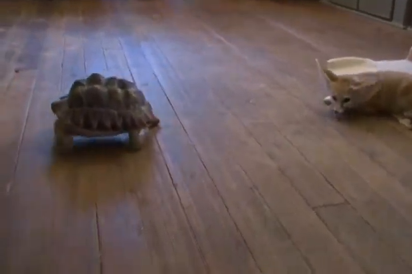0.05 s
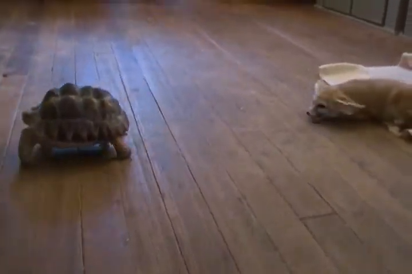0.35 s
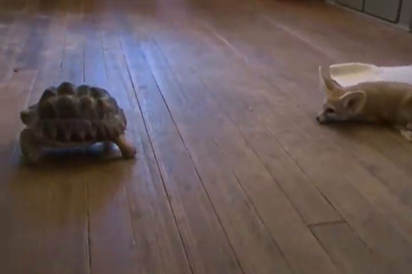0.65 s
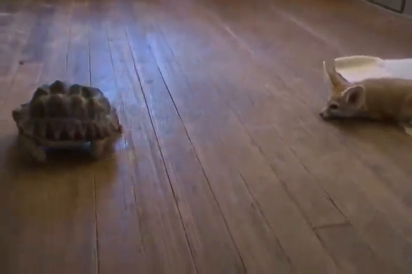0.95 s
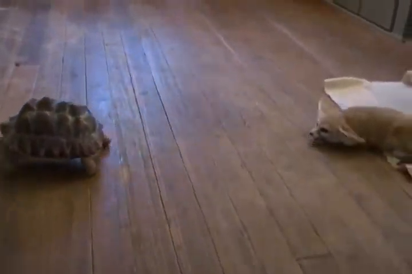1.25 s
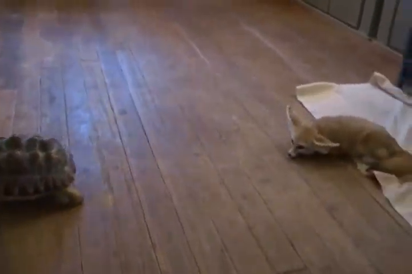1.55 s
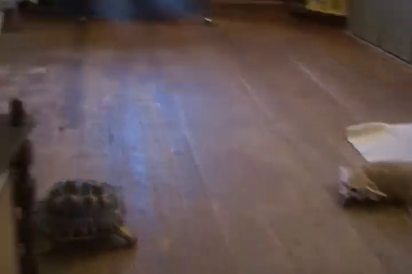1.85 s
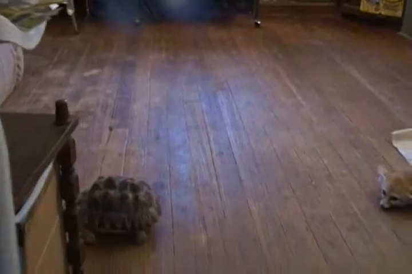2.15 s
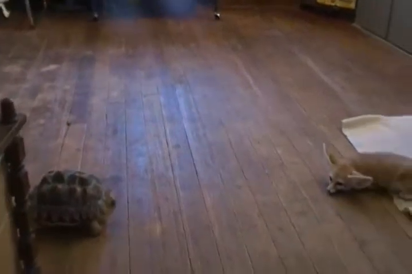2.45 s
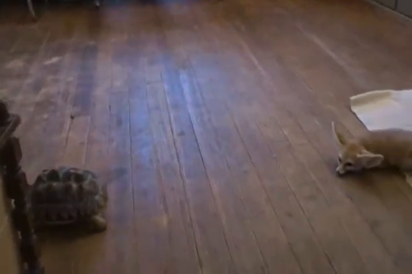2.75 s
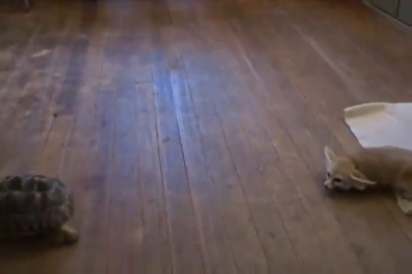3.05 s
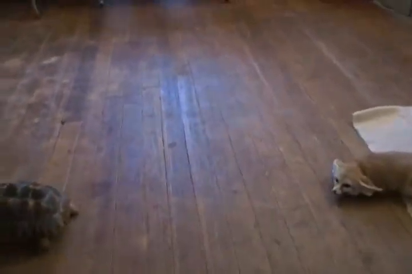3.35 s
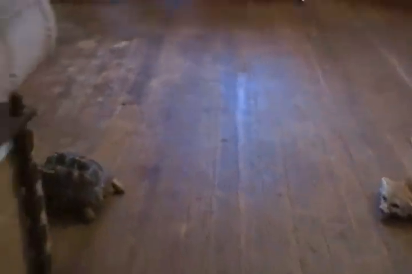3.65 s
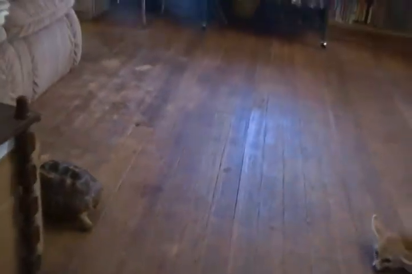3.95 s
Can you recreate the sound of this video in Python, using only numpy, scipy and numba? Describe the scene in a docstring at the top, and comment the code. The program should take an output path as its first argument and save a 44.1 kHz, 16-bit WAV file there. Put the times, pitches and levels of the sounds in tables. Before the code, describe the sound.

A small fox squeals four times, loud and harsh, in a quiet room.

```python
"""A quiet room with a wooden floor. Just right of the microphone a small fox squeals four times, while
a tortoise plods about with soft bumps, knocks and claw scratches. Each cry starts as a clean whine,
then breaks into a harsh scream: two vocal folds swing at different pitches and their sum tones ring
in the throat. The recorder's gain control ducks the room's hum under every cry."""
import sys
import numpy as np
from scipy import signal
from scipy.fft import rfft, irfft
from scipy.io import wavfile
from scipy.ndimage import uniform_filter1d, minimum_filter1d, map_coordinates
from numba import njit

SR = 44100
rng = np.random.default_rng(int(sys.argv[2]) if len(sys.argv) > 2 else 0)


def dump(signal):
    """Clip the signal to [-1, 1] and save it as 16-bit WAV at the path in sys.argv[1]."""
    limited = np.clip(np.atleast_2d(signal).T, -1, 1)
    pcm = np.round(limited * 32767).astype(np.int16)
    wavfile.write(sys.argv[1], SR, pcm)


N = 176400

# three short screams, then a long one: time_s, lower_fold_hz, upper_fold_hz, level_db, mouth, roughness
SCREAMS = [
    [(.188, 1302, 1667, -12, 0.94, 1.1), (.24, 1278, 1677, -9, 0.96, 0.8),
     (.31, 1259, 1651, -7.5, 1, 0.744), (.355, 1290, 1670, -4.5, 1, 0.885),
     (.40, 1213, 1622, -12.5, 0.55, 0.92), (.445, 1063, 1473, -23.5, 0.05, 0.77),
     (.475, 1033, 1423, -32.5, 0, 0.22)],
    [(1.349, 1329, 1631, -8, 0.85, 1.26), (1.365, 1262, 1602, -11, 0.9, 0.92),
     (1.395, 1231, 1560, -8.5, 0.88, 0.45), (1.445, 1183, 1519, -5.5, 0.87, 0.53),
     (1.472, 1153, 1496, -15.5, 0.62, 0.55), (1.50, 1009, 1397, -20.5, .1, 0.77),
     (1.53, 965, 1345, -27, 0, 0.516)],
    [(1.828, 1245, 1603, -11, 0.89, 0.97), (1.87, 1235, 1632, -12, 0.86, 0.62),
     (1.945, 1318, 1727, -4.5, 0.97, 0.93), (1.99, 1250, 1631, -5, 0.95, 1.25),
     (2.06, 1128, 1539, -16.5, 0.43, 0.6), (2.13, 1095, 1566, -17.5, 0.24, 0.63),
     (2.205, 1061, 1598, -16.5, 0.02, 1.1), (2.26, 994, 1333, -22.5, 0.24, 1.3)],
    [(3.05, 1094, 1336, -26, 0, 1), (3.115, 1156, 1426, -13, 0.38, 0.876),
     (3.2, 1182, 1470, -10, 0.64, 1.06), (3.28, 1169, 1484, -10.5, 0.68, 0.98),
     (3.335, 1158, 1459, -7.5, 0.69, 0.65), (3.41, 1197, 1535, -7.5, 0.78, 0.86),
     (3.52, 1161, 1546, -9, 0.83, 0.84), (3.62, 1181, 1560, -7.5, 0.83, 0.743),
     (3.72, 1163, 1517, -9.5, 0.85, 0.77), (3.81, 1026, 1348, -18.5, 0.1, 0.64),
     (3.87, 1000, 1286, -34, 0, 0.93)],
]  # mouth runs from 0 (shut) to 1 (open)
# tones the two folds make together: lower_multiple, upper_multiple
FOLD_TONES = [(1, 0), (0, 1), (-1, 2), (2, 0), (1, 1), (0, 2), (3, 0), (2, 1), (1, 2), (3, 1), (2, 2),
              (1, 3), (4, 1), (3, 2), (4, 2), (3, 3)]
# balance of those tones, in the same order: level_db
SHORT_TONE_DB = [4, 2, -3, -.5, 3, -4, 1.5, 3, 4, -2, -4.5, -10.5, -9, -10.5, -8.5, -17]
LONG_TONE_DB = [2.5, -4, -6.5, 3, 4.5, 0, 2, 2, -2.5, -0.5, -7, -4, -4.5, -32, -17, -20]
# throat resonances: shut_hz, open_hz, base_width_hz, shut_db, open_db
SHORT_THROAT = [(1480, 1230, 650, 0.5, -15), (2080, 2700, 1330, -11, -10.5), (3170, 4360, 1130, -17, -1),
                (4670, 6500, 1230, -14.5, -11), (8600, 7970, 1230, -28, -18.5)]
LONG_THROAT = [(1536, 1530, 580, 4, -11.5), (2460, 3023, 1060, -13, -1), (3570, 3580, 1406, -4.5, -2),
               (4220, 4700, 1204, -20, 3.5), (8300, 9800, 2400, -33, -25)]
# dips between the resonances: centre_hz, width_hz, depth_share
SHORT_DIPS = [(2160, 360, 0.11), (3560, 280, 0)]
LONG_DIPS = [(2076, 450, 0.47), (3000, 180, 0.61)]
# paths of the clean voice: time_s, pitch_hz, level_db
WHINES = [
    [(.119, 1460, -26.5), (.131, 1265, -18.5), (.142, 1452, -23.5), (.158, 1391, -31), (.1595, 1452, -10.5),
     (.175, 1647, -9), (.191, 1682, -9), (.203, 1620, -28)],
    [(1.241, 1140, -22), (1.271, 1352, -18), (1.279, 1280, -17.5), (1.305, 1470, -16.5), (1.322, 1452, -27),
     (1.3245, 1610, -2.5), (1.346, 1649, -2), (1.356, 1730, -19)],
    [(1.791, 1281, -21.5), (1.818, 1440, -22.5), (1.822, 1518, -6), (1.832, 1540, -13.5),
     (1.845, 1450, -26)],
]  # one opens each short cry
SQUEAK = [(2.16, 1551, -28.5), (2.21, 1680, -15), (2.236, 1770, -15), (2.255, 1883, -14.5),
          (2.276, 1990, -17), (2.294, 1786, -18.5)]  # the upper fold alone as the third cry ends
YELP = [(3.026, 904, -32), (3.043, 990, -18.5), (3.066, 1074, -27)]  # low, opens the long cry
# harmonics of the clean voice, from the first up: level_db
SOFT_WHINE_DB = [-1.5, -12, -18, -24.5, -30, -58]
LOUD_WHINE_DB = [-12, -4.5, -4.5, -19.5, -32, -37.5]
SQUEAK_DB = [-5.5, -3.5, -12, -26, -25.5, -35]
YELP_DB = [-6.5, -4, -12.5, -18, -23.5, -29]
# soft bumps on the floor: start_s, base_level_db, decay_s, pitch_hz
BUMPS = [(0.035, -25.5, 0.035, 39), (0.111, -36.5, 0.056, 49), (0.904, -38.5, 0.0086, 264),
         (2.659, -32, 0.018, 223), (2.669, -31.5, 0.043, 44), (2.818, -22.5, 0.054, 37),
         (2.889, -22, 0.038, 34.4), (3.476, -35, .025, 207)]
# knocks and claw scratches on the boards: start_s, level_db, decay_s
KNOCKS = [(.036, -28, 0.0064), (.9, -48, 0.014), (2.645, -40, 0.021), (2.955, -37.5, 0.15),
          (3.313, -27.5, 0.017)]
SCRATCHES = [(.836, -34, 0.018), (.862, -45, 0.014), (.954, -35, 0.0025), (1.203, -38.5, 0.0039),
             (2.655, -46.5, 0.044)]
# spectra of the boards, the claws and the room tone: frequency_hz, relative_db
BOARD_COLOUR = [(100, -8.5), (320, 1), (700, -3), (1400, -6.5), (3500, -21.5), (7000, -55), (12000, -58.5)]
CLAW_COLOUR = [(800, -21.5), (2500, -3.5), (4700, 1), (7000, -11.5), (11000, -12.5)]
ROOM_COLOUR = [(15, -35.5), (25, 0), (70, -10), (115, -16), (249, -19.5), (418, -21.5), (682, -25.5),
               (776, -24), (861, -28.5), (1440, -33.5), (1600, -32.5), (1920, -33.5), (9760, -44.5),
               (12000, -53), (15600, -64), (22000, -120)]
# stereo width of diffuse sound at the microphone: frequency_hz, side_over_mid_db
SPREAD = [(60, -10.5), (500, -14.5), (1300, -7.5), (4000, -2.5), (8000, 3)]
# time the room takes to fall 60 dB: frequency_hz, decay_s
ROOM_T60 = [(200, 0.11), (1200, 0.47), (2500, 0.37), (4500, 0.31), (10000, 0.31)]

# jitter and waver are shares of the pitch; rates are changes per second
LOW_JITTER, HIGH_JITTER, JITTER_RATE = 0.0224, 0.065, 420  # screaming folds at roughness 1
WHINE_JITTER, SQUEAK_JITTER, YELP_JITTER = 0.01466, 0.027, 0.033
WAVER, WAVER_RATE = 0.003997, 45.8
DRIFT_RAD, DRIFT_RATE = 1.36, 12.3  # each tone wanders out of step with the others
FLUTTER, FLUTTER_RATE = 1.5, 800  # fast flicker in the strength of the tones
SCREAM_SHUDDER_DB, WHINE_SHUDDER_DB, SHUDDER_RATE = 0.5, 0.8, 270
FOLD_DRIVE, SCREAM_AIR_DB, WHINE_AIR_DB = 1.27, 1, -16.5  # air at roughness 1 and at full press
VOICE_LOW_HZ, PIERCE_WIDTH_HZ = 990, 330.0
TREBLE_CUT_HZ = 9720  # a steep cut of the top treble during the screams
SOFT_AT_DB, LOUD_AT_DB, EDGE_S = -20, -12, 0.0009
REVERB_DB, REVERB_ONSET_S, LEFT_LAG_S = -5, 0.0041, 0.000019
ROOM_TONE_DB, HUM_DB, HUM_HZ = -37, -45.5, 120
THRESHOLD, RATIO, ATTACK_S, RELEASE_S = 0.5024, 17, 0.0017, 0.13
CEILING, LOOK_AHEAD_S, TOP_HZ = 0.71, 0.00028, 12000


def screams(tables, tone_db, throat, dips, pierce=0):
    """The fox's harsh voice: two clashing folds and rushing air sound through the throat."""
    gate = sum(controls(rows)[0] for rows in tables)
    _, low_hz, high_hz, db, mouth, rough = controls([row for rows in tables for row in rows])
    voice = throat_ring(vocal_folds(low_hz, high_hz, rough, tone_db), mouth, throat)
    # with the mouth open, one sum tone can ring piercingly
    voice += pierce * mouth ** 2 * bandpass(voice, 2 * low_hz + high_hz, PIERCE_WIDTH_HZ)
    for hz, width, depth in dips:
        voice -= depth * bandpass(voice, np.full(N, float(hz)), float(width))
    band = signal.butter(8, [VOICE_LOW_HZ, TREBLE_CUT_HZ], "band", fs=SR, output="sos")
    voice = signal.sosfilt(band, voice)
    voice /= np.sqrt(uniform_filter1d(voice ** 2, size=2048) + 1e-12)  # even out the level
    return voice * gate * undb(db + SCREAM_SHUDDER_DB * wander(SHUDDER_RATE))


def vocal_folds(low_hz, high_hz, rough, tone_db):
    """Two folds beat roughly against each other, while air puffs through in time with the lower."""
    waver = 1 + WAVER * wander(WAVER_RATE)
    low = fold_phase(low_hz * waver, LOW_JITTER * rough)
    high = fold_phase(high_hz * waver, HIGH_JITTER * rough)
    low_size = np.sqrt(undb(FLUTTER * rough * wander(FLUTTER_RATE)))
    high_size = undb(FLUTTER * rough * wander(FLUTTER_RATE))
    tones = np.zeros(N)
    for (m, n), db in zip(FOLD_TONES, tone_db):
        phase = m * low + n * high + DRIFT_RAD * wander(DRIFT_RATE)
        tones += undb(db) * (high_size if n else low_size) * np.sin(phase)
    colliding = unit(np.tanh(FOLD_DRIVE * unit(tones)))  # collisions flatten the largest swings
    air = unit(rng.standard_normal(N) * (1 + np.sin(low)))
    return colliding + undb(SCREAM_AIR_DB) * rough * air


def throat_ring(source, mouth, throat):
    """The throat's resonances shift and brighten as the mouth opens."""
    voice = np.zeros(N)
    for k, (shut_hz, open_hz, width, shut_db, open_db) in enumerate(throat):
        hz = shut_hz + (open_hz - shut_hz) * mouth
        db = shut_db + (open_db - shut_db) * mouth
        voice += (-1) ** k * undb(db) * resonance(source, hz, 1.817 * width)
    return voice


def clean_voice(rows, soft_db, loud_db, jitter):
    """One fold swings alone; pressed harder, it gains air and moves from soft to loud harmonics."""
    gate, hz, db = controls(rows)
    phase = fold_phase(hz, jitter)
    press = np.clip((db - SOFT_AT_DB) / (LOUD_AT_DB - SOFT_AT_DB), 0, 1)
    tone = sum(undb(soft + (loud - soft) * press) * np.sin(k * phase)
               for k, (soft, loud) in enumerate(zip(soft_db, loud_db), 1))
    air = undb(WHINE_AIR_DB) * press * unit(resonance(rng.standard_normal(N), hz=4000, width_hz=2340))
    return gate * undb(db + WHINE_SHUDDER_DB * wander(SHUDDER_RATE)) * (tone + air)


def fold_phase(hz, jitter):
    """Phase of a vocal fold with an unsteady pitch."""
    return 2 * np.pi * np.cumsum(hz * (1 + jitter * wander(JITTER_RATE))) / SR


def rattle(start_s=1.3265, length_s=0.028, pulse_hz=107, depth=0.95):
    """Gain that makes the second whine stutter in three rasping pulses as it breaks."""
    age = np.maximum(times() - start_s, 0)
    return 1 - depth * (age < length_s) * np.abs(np.sin(np.pi * pulse_hz * age))


def wheeze(start_s=0.53, length_s=0.35, pitch_hz=1675, rise_hz_per_s=580, level_db=-43):
    """A faint, slowly rising whistle after the first cry, likely the fox drawing air."""
    age = np.clip(times() - start_s, 0, length_s)
    arch = np.sqrt(np.abs(np.sin(np.pi * age / length_s)))
    whistle = resonance(rng.standard_normal(N), pitch_hz + rise_hz_per_s * age, width_hz=650)
    return undb(level_db) * arch * unit(whistle)


def floor_contacts(rows, spectrum):
    """Knocks or scratches on the boards: short bursts of noise with one colour."""
    noise = unit(colour(rng.standard_normal(N), spectrum))
    return noise * sum(strike(*row, rise_s=0.00025) for row in rows)


def floor_bumps():
    """Dull thuds on the floor, each a low and quickly damped swing."""
    return sum(2 * strike(at, db, decay, rise_s=0.0019) * np.sin(2 * np.pi * hz * (times() - at))
               for at, db, decay, hz in BUMPS)


def reverb(x):
    """Dense reflections from boards and walls reach the microphone from all sides."""
    response = diffuse(reverb_tail(), reverb_tail())
    return undb(REVERB_DB) * signal.fftconvolve(x[None], response, axes=1)[:, :N]


def reverb_tail():
    """The room's ring dies away octave by octave; the midrange lasts longest."""
    t, hz = times()[:SR], np.fft.rfftfreq(SR, 1 / SR)
    centres_hz = 125 * 2. ** np.arange(8)
    spectrum = rfft(rng.standard_normal(SR))
    tail = np.zeros(SR)
    for centre, weights in zip(centres_hz, np.eye(8)):
        band = irfft(spectrum * on_log(list(zip(centres_hz, weights)), hz), SR)
        tail += band * np.exp(-np.log(1000) * t / on_log(ROOM_T60, centre))
    tail *= np.clip(t / REVERB_ONSET_S - 0.5, 0, 1)
    return tail / np.sqrt(np.sum(tail ** 2))


def room_tone():
    """The bed under it all: gently wavering rumble and hiss, and steady mains hum."""
    mid, side = (unit(colour(rng.standard_normal(N), ROOM_COLOUR)) for _ in range(2))
    hum = undb(HUM_DB) * np.sqrt(2) * np.sin(2 * np.pi * HUM_HZ * times())
    return undb(ROOM_TONE_DB + 2.03 * wander(rate=11)) * diffuse(mid, side) + hum


def diffuse(mid, side):
    """Left and right of a sound from all around: alike in the bass, unlike in the treble."""
    side = colour(side, SPREAD)
    return np.array([mid + side, mid - side])


def strike(start_s, db, decay_s, rise_s):
    """Envelope of one contact."""
    age = np.maximum(times() - start_s, 0)
    return undb(db) * (1 - np.exp(-age / rise_s)) * np.exp(-age / decay_s)


def controls(rows):
    """A gate over the table's span, then each column as a curve."""
    t = times()
    at, *columns = np.array(rows, float).T
    gate = np.clip((t - at[0]) / EDGE_S, 0, 1) * np.clip((at[-1] - t) / EDGE_S + 1, 0, 1)
    return [gate] + [np.interp(t, at, column) for column in columns]


def resonance(x, hz, width_hz):
    """A steep resonance: two band-passes in a row, each width_hz wide."""
    hz = hz * np.ones(N)
    return bandpass(bandpass(x, hz, float(width_hz)), hz, float(width_hz))


@njit
def bandpass(x, hz, width_hz):
    """State-variable band-pass with a moving centre, gain 1 there."""
    y, band, low = np.empty(len(x)), 0., 0.
    for i in range(len(x)):
        g, damping = np.tan(np.pi * hz[i] / SR), width_hz / hz[i]
        v = (band + g * (x[i] + 1e-18 - low)) / (1 + g * (g + damping))
        band, low = 2 * v - band, low + 2 * g * v
        y[i] = damping * v
    return y


@njit
def follow(x, attack, release):
    """Level follower, quick up and slow down."""
    y, level = np.empty(len(x)), 0.
    for i in range(len(x)):
        level += (x[i] - level) * (attack if x[i] > level else release)
        y[i] = level
    return y


def wander(rate):
    """Smooth random curve of rms 1."""
    step = max(int(SR / rate), 2)
    spectrum = rfft(rng.standard_normal(N))
    return unit(irfft(spectrum / (1 + (2 * np.fft.rfftfreq(N) * step) ** 4), N))


def colour(x, points):
    """Filter by (frequency_hz, gain_db) points."""
    return irfft(rfft(x) * undb(on_log(points, np.fft.rfftfreq(len(x), 1 / SR))), len(x))


def on_log(points, hz):
    """Read (frequency_hz, value) points on a log-frequency axis."""
    point_hz, values = np.array(points, float).T
    return np.interp(np.log(hz + 1e-3), np.log(point_hz), values)


def undb(db):
    """Decibels to gain."""
    return 10 ** (np.asarray(db) / 20)


def unit(x):
    """Scale to rms 1."""
    return x / np.sqrt(np.mean(x ** 2) + 1e-18)


def times():
    """Time of every sample."""
    return np.arange(N) / SR


def scene():
    """Fox, knocks and scratches sit a little right of the microphone and ring in the room."""
    harsh = screams(SCREAMS[:-1], SHORT_TONE_DB, SHORT_THROAT, SHORT_DIPS, pierce=1.08)
    harsh += screams(SCREAMS[-1:], LONG_TONE_DB, LONG_THROAT, LONG_DIPS)
    whines = sum(clean_voice(rows, SOFT_WHINE_DB, LOUD_WHINE_DB, WHINE_JITTER) for rows in WHINES)
    squeak = clean_voice(SQUEAK, SQUEAK_DB, SQUEAK_DB, SQUEAK_JITTER)
    yelp = clean_voice(YELP, YELP_DB, YELP_DB, YELP_JITTER)
    fox = harsh + rattle() * whines + squeak + yelp + wheeze()
    near = fox + floor_contacts(KNOCKS, BOARD_COLOUR) + floor_contacts(SCRATCHES, CLAW_COLOUR)
    left = map_coordinates(near, [np.arange(N) - LEFT_LAG_S * SR], mode="nearest")
    return np.array([left, near]) + reverb(near) + floor_bumps() + room_tone()


def record(dry):
    """Gain control holds the cries down and recovers; a limiter catches peaks and the top is cut."""
    peak = np.abs(dry).max(axis=0) + 1e-9
    level = follow(peak, 1 / (ATTACK_S * SR), 1 / (RELEASE_S * SR))
    gain = np.minimum(THRESHOLD / level, 1) ** (1 - 1 / RATIO)
    gain = np.minimum(gain, CEILING / peak)
    span = 2 * int(LOOK_AHEAD_S * SR) + 1
    held = dry * uniform_filter1d(minimum_filter1d(gain, span), span)
    return signal.sosfilt(signal.ellip(8, 0.2, 80, TOP_HZ, fs=SR, output="sos"), held)


dry = scene()
out = record(dry)
dump(out)
```